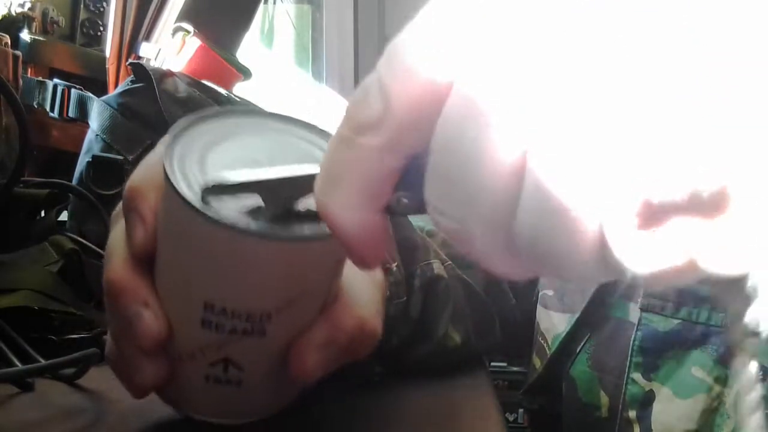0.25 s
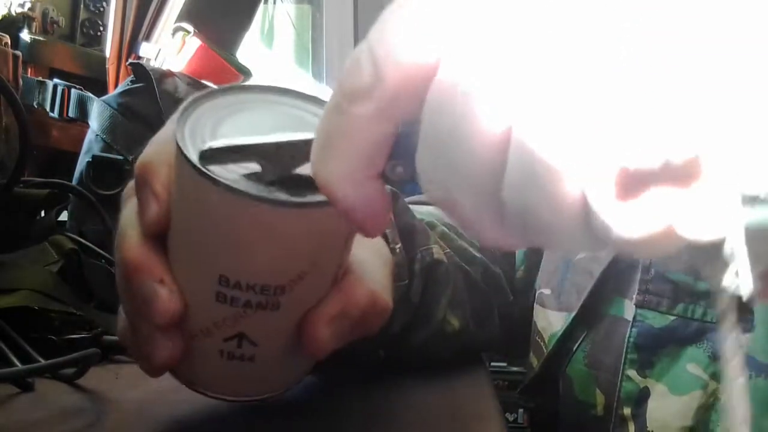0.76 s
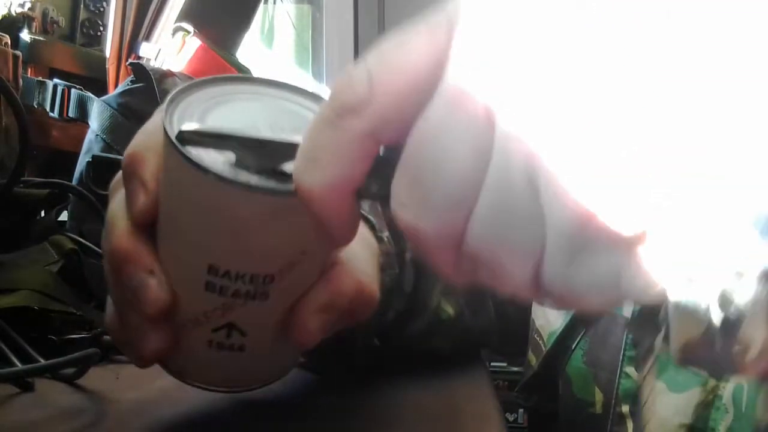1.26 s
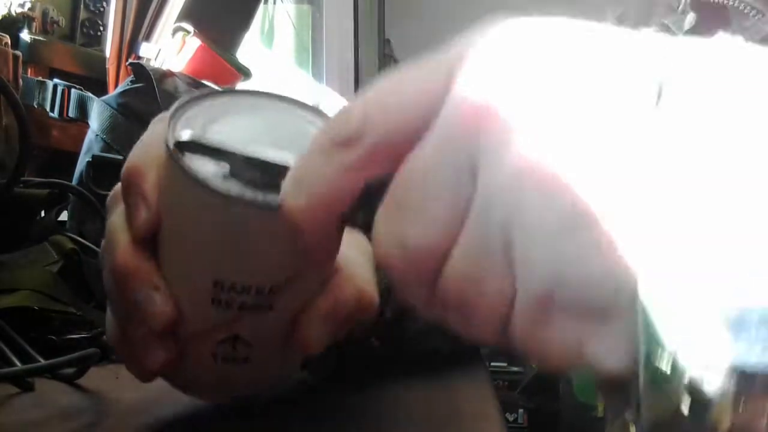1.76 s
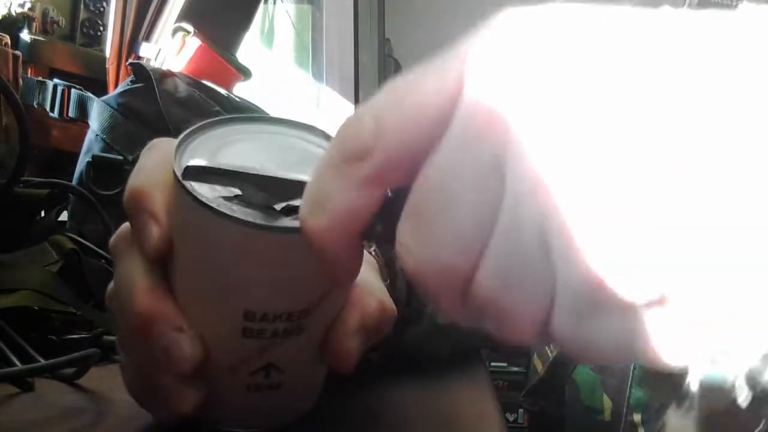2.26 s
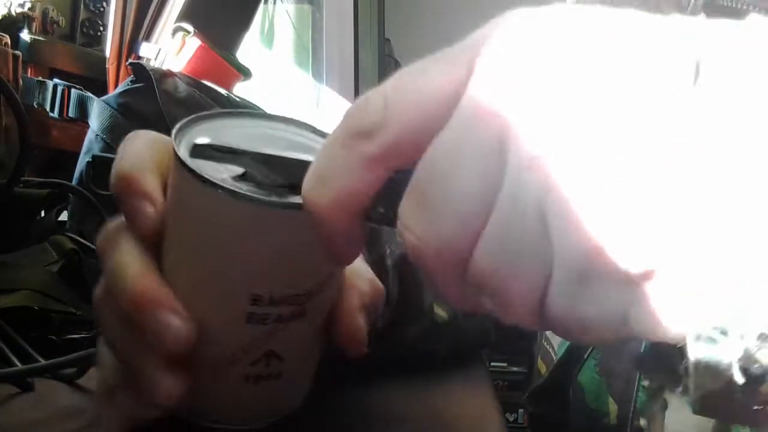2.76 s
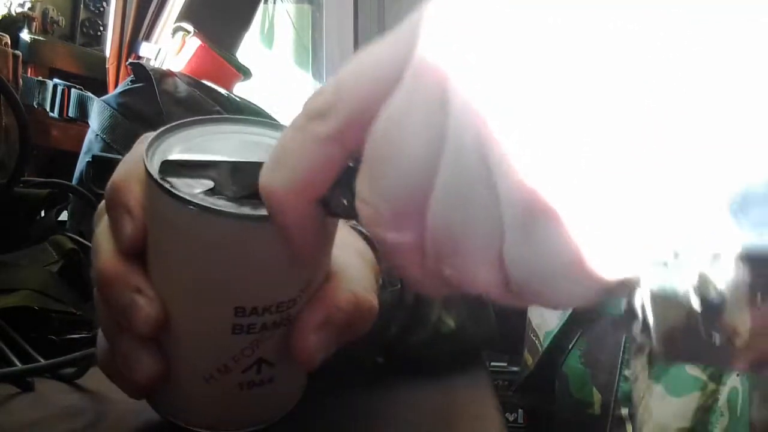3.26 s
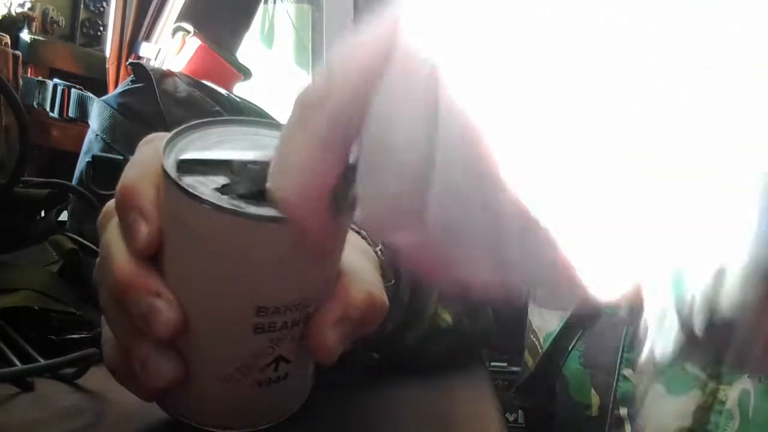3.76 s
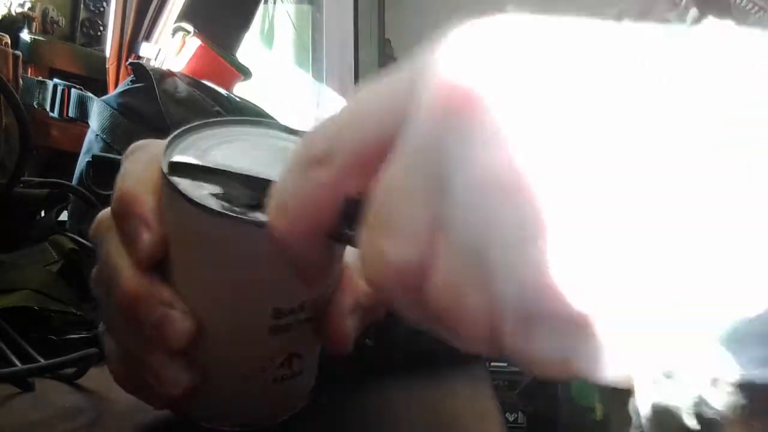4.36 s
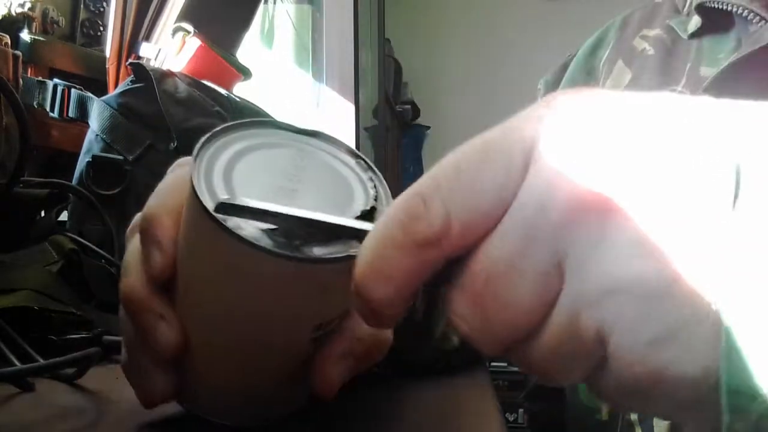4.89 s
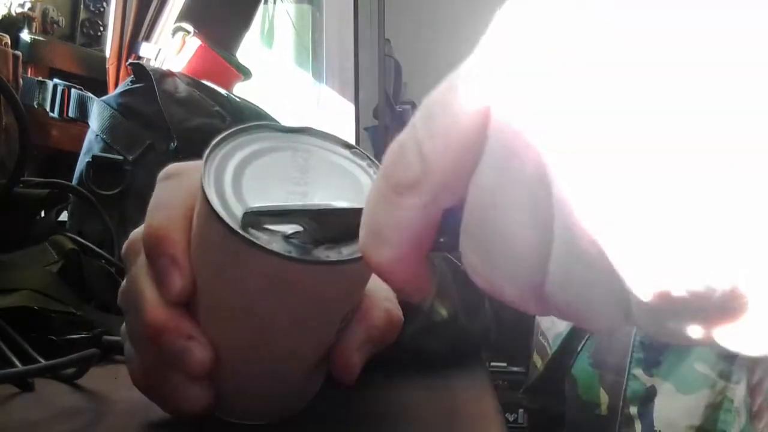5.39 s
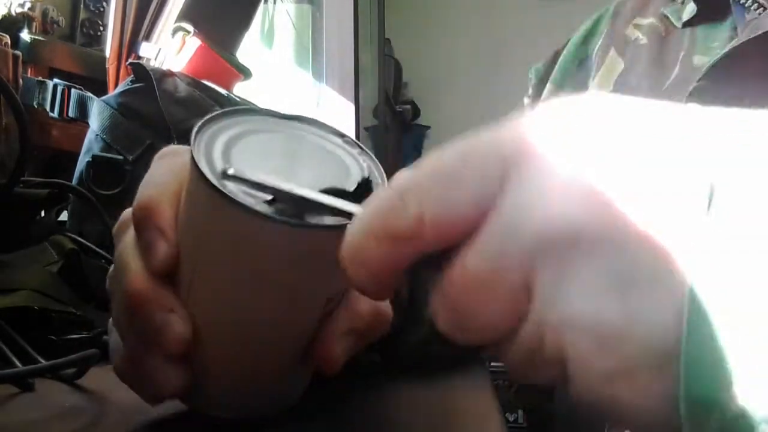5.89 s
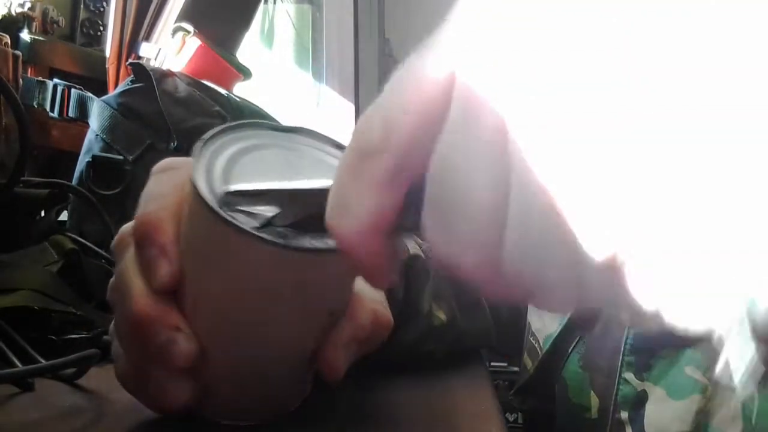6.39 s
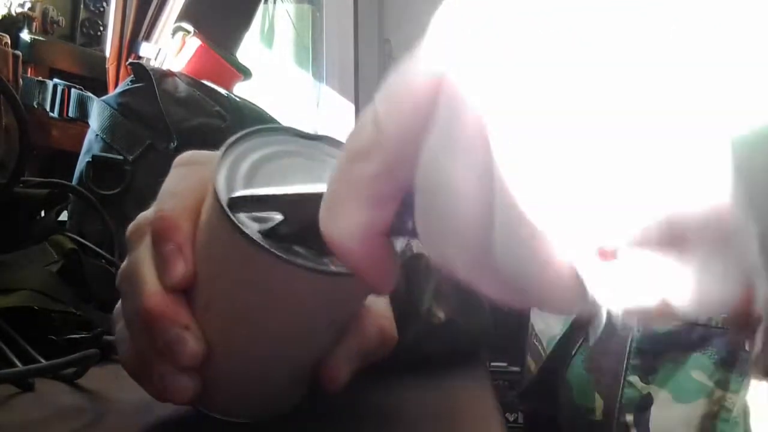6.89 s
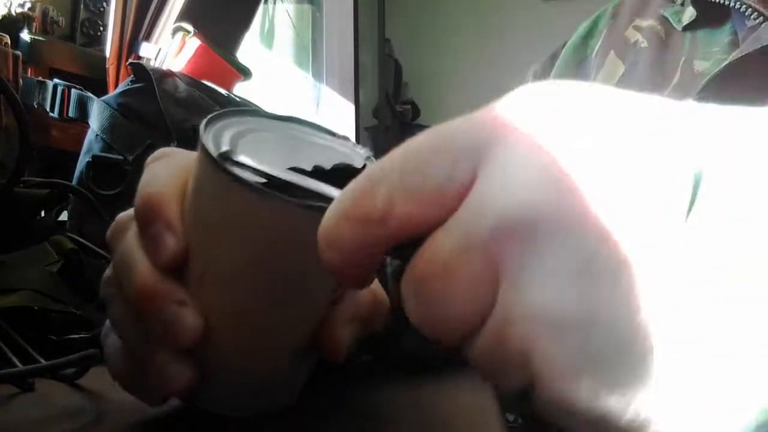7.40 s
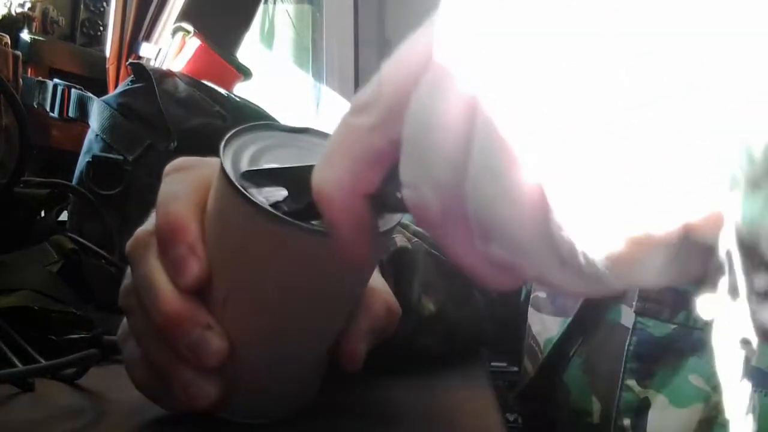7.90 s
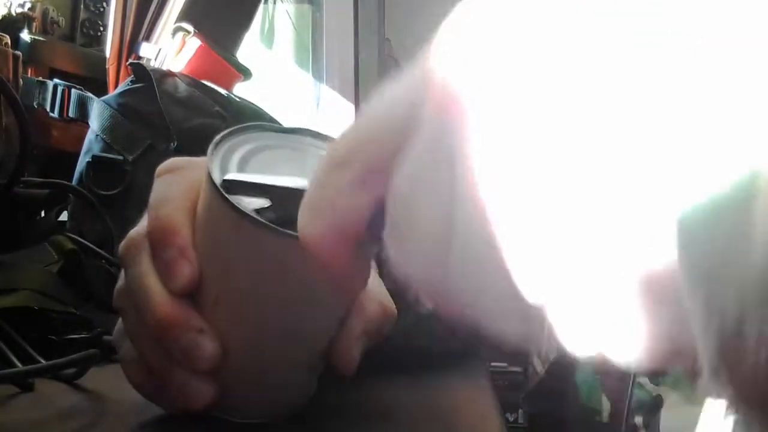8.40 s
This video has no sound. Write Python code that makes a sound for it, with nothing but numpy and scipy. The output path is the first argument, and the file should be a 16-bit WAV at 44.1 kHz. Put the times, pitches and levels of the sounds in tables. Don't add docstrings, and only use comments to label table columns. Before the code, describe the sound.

A small lever opener bites round an empty steel tin's rim, with irregular hollow clunks, dull metallic tears and gritty scrapes, then brighter loose snaps.

```python
import sys
import numpy as np
from scipy import signal
from scipy.fft import rfft, irfft, next_fast_len
from scipy.io import wavfile

SR = 44100
rng = np.random.default_rng(int(sys.argv[2]) if len(sys.argv) > 2 else 0)


def to_linear_factor(level_db):
    exponent = np.asarray(level_db, float) / 20
    return 10 ** exponent


def persist_wave(psi):
    counts = np.round(np.clip(psi, -1, 1) * 32767).astype(np.int16)
    wavfile.write(sys.argv[1], SR, np.atleast_2d(counts).T)


N = 381465

# (pitch_hz, level_db, fade_60db_s)
LID_MODES = [(487.6, -17, .09), (697, -9, .1), (812.7, -18.5, .12)]
# (pitch_hz, level_db, fade_60db_s)
WALL_MODES = [(1038, 1.5, 0.059), (1140, 2.5, 0.048), (1324, -7, 0.062), (1632, -1.5, 0.024),
              (1722, -12.5, 0.059), (1910, -13, 0.078), (2142, -16.5, 0.057)]
# (pitch_hz, level_db, fade_60db_s)
BLADE_MODES = [(2970, 5, 0.065), (3430, -6, 0.032), (3465, -11, 0.11), (3690, -11, 0.054), (4146, 0, 0.029),
               (5130, -9, 0.1), (5580, -13, 0.081), (5990, -1, 0.056), (6430, 0.5, 0.022), (6900, -9, 0.03),
               (7370, -9, 0.07)]
# (pitch_hz, level_db)
SHEET_COLOUR = [(2000, -13), (2800, 1.5), (3600, -3.5), (4600, -6), (5300, -4), (6800, 1), (8000, -11),
                (9500, -26), (12000, -49), (16000, -54.5)]
# (peak_s, lid_db, lid_note_hz, wall_db, blade_db), wall and blade relative to lid
LOOSE_SNAPS = [(7.1301, -49, 680, -12, 6), (7.1463, -15, 654, -2, 1.5), (7.3773, -36.5, 626, 4.5, -4.5),
               (7.4564, -35, 655, 0.5, -8), (7.4925, -39.5, 674, 7.5, -4.5),
               (7.5036, -32.5, 647, -0.5, 4.5), (7.6824, -44.5, 638, 6.5, 2.5),
               (8.0486, -31, 774, -7, -4.5), (8.0564, -38.5, 704, 8, -1), (8.0906, -26.0, 646, 8.5, 10.5),
               (8.109, -39.5, 610, 3, 10), (8.2776, -32, 654, 7, -7.5), (8.337, -35, 751, 0.5, -7),
               (8.369, -34, 751.0, 7.5, 22), (8.4866, -49.5, 823, 4.5, 12), (8.5478, -38.5, 647, 5.5, 11.5),
               (8.6236, -41.5, 746, 5, -1)]


def unit(x):
    return x / np.sqrt(np.mean(np.abs(x) ** 2) + 1e-20)


def along(points, hz):
    f, v = np.transpose(points)
    return np.interp(np.log(hz + 1), np.log(f + 1), v)


def filtered(x, response):
    m = next_fast_len(x.shape[-1] + 8192)
    spectrum = rfft(x, m) * response(np.fft.rfftfreq(m, 1 / SR))
    return irfft(spectrum, m)[..., :x.shape[-1]]


def band(lo_hz, hi_hz):
    return lambda f: 1 / np.sqrt((1 + (lo_hz / (f + 1)) ** 8) * (1 + (f / hi_hz) ** 8))


def wobble(rate):
    knots = int(N * rate / SR) + 2
    return np.interp(np.arange(N) * rate / SR, np.arange(knots), rng.standard_normal(knots))


def rings(modes, t, scatter_db):
    hz, db, t60 = np.transpose(modes)[..., None]
    luck = rng.standard_normal((2, len(modes), 1))
    fade = np.exp(np.float32(-np.log(1000) / t60 * t))
    phase = np.float32(2 * np.pi * hz * (1 + .008 * luck[0]) * t + 2 * luck[1])
    return np.sum(to_linear_factor(db + scatter_db * luck[0]) * fade * np.sin(phase), 0)


def driven(modes, force, wander_db):
    out = np.zeros(N)
    for hz, db, t60 in modes:
        r = to_linear_factor(-60 / (t60 * SR))
        gain = to_linear_factor(db + wander_db * wobble(25)) * np.sqrt(2 * (1 - r * r))
        resonator = [1, -2 * r * np.cos(2 * np.pi * hz / SR), r * r]
        out += signal.lfilter([.5, 0, -.5], resonator, gain * force)
    return out / np.linalg.norm(to_linear_factor([db for _, db, _ in modes]))


def room_tone():
    # (pitch_hz, level_db_per_hz)
    hiss_colour = [(15, -28), (25, 3.5), (85, -9), (714, -11), (840, -11.5), (1230, -16), (2480, -26.5),
                   (5280, -36), (6210, -36), (9800, -52.5), (16000, -44)]
    # (pitch_hz, level_db)
    whines = [(6040, -97), (12080, -93)]
    # (time_s, level_db)
    hiss_level = [(1.7, -3.5), (2.1, 1)]
    t = np.arange(N) / SR
    hiss = unit(filtered(rng.standard_normal(N), lambda hz: to_linear_factor(along(hiss_colour, hz))))
    whine = sum(to_linear_factor(db) * np.sin(2 * np.pi * hz * t) for hz, db in whines)
    return to_linear_factor(-59.5 + np.interp(t, *np.transpose(hiss_level))) * hiss + whine


def room(x):
    # (pitch_hz, fade_60db_s)
    room_fade = [(200, 0.18), (1500, 0.12), (8000, 0.047)]
    hz, t, z = signal.stft(rng.standard_normal(SR // 2), SR, nperseg=256)
    fade = to_linear_factor(-60 * t / along(room_fade, hz)[:, None])
    tail = signal.istft(z * fade, SR, nperseg=256)[1]
    late = np.pad(x, (200, 0))
    return signal.fftconvolve(late, tail / np.linalg.norm(tail))[:N]


def table():
    # (start_s, peak_db)
    thumps = [(0.266, -46), (2.094, -36), (2.294, -49.5), (2.479, -37.5), (2.718, -40.5), (2.913, -34.5),
              (3.264, -49.5), (3.492, -50.5), (4.452, -43), (4.8, -60), (6.024, -32), (6.783, -43.5),
              (7.247, -45.5), (7.73, -36), (8.155, -42), (8.276, -45), (8.455, -53.5)]
    # (start_s, peak_db)
    jolts = [(1.895, -46.5), (3.111, -49.5), (3.605, -45), (3.819, -37.5), (4.003, -35.5), (4.345, -37),
             (5.115, -38), (5.703, -47), (6.123, -35.5), (6.72, -41.5), (7.504, -50), (8.545, -47.5)]
    # (pitch_hz, level_db, fade_60db_s)
    push_modes = [(134, 3.0, 0.093), (166, 4.5, 0.061), (69, -27.5, .1), (202, -4.5, 0.091)]
    knock_modes = [(214, 1, 0.071), (142, -5.5, 0.11), (291, -4, 0.089)]
    out, t = np.zeros(N + SR // 4), np.arange(SR // 4) / SR
    board = sum(-to_linear_factor(db - 60 * t / t60) * np.sin(2 * np.pi * hz * t) for hz, db, t60 in push_modes)
    soft_start, quick_start = 1 - np.exp(-t / 0.0043), 1 - np.exp(-t / 0.0017)
    for s, db in thumps:
        out[round(s * SR):][:len(t)] += to_linear_factor(db + 5.0) * board * soft_start
    for s, db in jolts:
        knock = rings(knock_modes, t, scatter_db=1.0)
        out[round(s * SR):][:len(t)] += to_linear_factor(db + 4.0) * knock * quick_start
    return out[:N]


def contacts():
    # (peak_s, lid_db, lid_note_hz, wall_db, blade_db), wall and blade relative to lid
    snaps = [(0.0201, -29, 598, -7.5, -26), (0.346, -27, 583, -6, -26), (0.5704, -13, 682, -18, -25.5),
             (1.6744, -34.5, 510, -16.0, -39), (1.7787, -16.5, 760, -8.5, -14),
             (1.897, -25.5, 683, 1.5, -16), (1.9064, -14.5, 674, -6, -23), (2.406, -6.5, 757, -16.5, -25.0),
             (2.4936, -19, 696, -11, -14), (2.7599, -33.0, 711, -24, -17), (2.8332, -27.5, 742, -7.5, -28),
             (3.2546, -24.5, 722, -19, -31), (3.8214, -22, 717, -7.5, -17),
             (3.9892, -28.5, 538, -1.5, -7.5), (4.0099, -5.5, 613, -6.0, -24.5),
             (5.1196, -27, 735.0, 0.5, -13), (5.281, -30.0, 786, -12, -20),
             (5.8829, -36.5, 737.0, 4.5, -12.5), (5.9667, -28.5, 486, 10.5, -10),
             (6.0066, -23.5, 756, -0.5, -6.0), (6.129, -19, 786, 0.1, -4.5), (6.2213, -39, 725, -2.5, -26),
             (6.548, -17.5, 770, -5.5, -13.5), (6.5886, -18.0, 964, -6.5, -25.5)]
    # (peak_s, lid_db, lid_note_hz, wall_db, blade_db), wall and blade relative to lid
    cuts = [(0.1977, -20, 630, -10, -22.5), (0.3625, -22.5, 606, 0, -31), (0.5828, -6, 775, -6.5, -24.5),
            (0.7271, -17.5, 586, -12, -27), (0.909, -16.5, 623, -27, -24.5),
            (0.9299, -23.5, 573, -0.5, -16), (1.0297, -31, 634, -13, -22), (1.6874, -24.5, 584, -9, -27),
            (1.6956, -24.5, 620, -8, -28), (2.0366, -15, 714, -7, -21.5), (2.226, -10, 645, -6.5, -24),
            (2.2764, -21.5, 773, -12, -19.5), (2.2908, -30, 790, -31, -9), (3.0742, -31.5, 698, -9, -28),
            (3.3988, -23.5, 751, -14, -30), (3.6103, -28, 643, -4.5, -12), (4.057, -33, 580, -13.0, -28),
            (4.3528, -18.5, 747, 0.3, -12), (5.6561, -41.5, 760, 10, -20.5), (5.7092, -23.5, 812, 0, -14),
            (5.7411, -29, 760, -3, -21), (5.907, -20, 743, -11, -30), (6.5276, -39.5, 754, 4, 1.5),
            (6.7308, -9.5, 735, -2.0, -12)]
    # (peak_s, lid_db, lid_note_hz, rise_ms)
    tears = [(0.3736, -23, 535, 20.4), (0.4303, -10, 634, 9.9), (0.6058, -30.5, 767, 18),
             (0.655, -29.5, 620.0, 8.9), (0.896, -19.5, 610.0, 15), (1.172, -36, 636, 11.7),
             (1.2783, -28, 541, 13.0), (1.4493, -41, 690.0, 21), (1.5346, -41, 722, 19),
             (1.7099, -13, 636, 10.5), (1.7201, -15, 737, 12.3), (2.0613, -21, 612, 21),
             (2.9486, -30.5, 711, 13), (3.141, -26, 746, 14.2), (3.6325, -30.5, 758, 19),
             (3.7976, -26, 840, 15.0), (3.832, -19, 770, 13.7), (4.0922, -32, 739.0, 9.7),
             (4.1538, -32.5, 753, 20), (4.3161, -31.5, 810, 15.4), (4.341, -24.5, 752, 13.5),
             (4.3892, -32.5, 780, 18), (5.6682, -38, 688.0, 9.3)]
    # (peak_s, lid_db, blade_db), blade relative to lid
    ticks = [(0.6298, -49.0, -6.5), (0.644, -51.5, 11), (2.808, -57.5, 8.5), (3.3336, -42, -11),
             (3.4964, -39, -7), (4.4581, -34, -1.5), (4.6107, -48.5, 8.5), (4.8089, -52.5, 11.5),
             (5.5692, -48, -19), (6.2822, -35.5, 2), (6.4506, -51.5, 5.5)]
    snap_ms, cut_ms, tick_ms, flap_ms = 3, 6.5, 3.2, 2.4
    brighten = 1.6
    bites_list = [(*b, snap_ms) for b in snaps]
    bites_list += [(*b, cut_ms) for b in cuts]
    bites_list += [(*b, flap_ms) for b in LOOSE_SNAPS]
    bites_list += [(s, db, hz, -13.5 + brighten * s, -32 + brighten * s, ms) for s, db, hz, ms in tears]
    bites_list += [(s, db, 690, -3.5, blade_db, tick_ms) for s, db, blade_db in ticks]
    return sorted(bites_list)


def strokes(t):
    # (peak_s, lid_db, blade_db, fall_20db_s)
    slides = [(0, -54.5, -75, 1.1), (.2, -46.5, -63, 0.05), (0.372, -46.5, -49.5, 0.05),
              (.6, -40.5, -59.5, 0.14), (1.71, -44.5, -65, .14), (1.94, -43, -61, 0.32),
              (2.215, -26.5, -53, 0.14), (3.02, -49, -64, 0.74), (3.631, -34, -56, 0.0157),
              (4.021, -35.5, -59, .14), (4.53, -59.5, -60.5, 0.54), (5.9, -42.5, -65, 0.08),
              (6.02, -53, -62.5, 0.53), (6.74, -45, -62, 0.2), (7.16, -43, -49, 0.1064),
              (7.7, -58, -66, .25), (8.109, -56, -59.5, 0.1), (8.38, -54, -59.5, 0.4)]
    # (start_s, lid_db, blade_db, held_s)
    rubs = [(0.877, -47.5, -68, 0.053), (1.05, -46.5, -79.5, 0.11), (1.258, -45, -72, 0.029),
            (1.365, -51.5, -83, 0.012), (1.425, -49, -89, 0.15), (2.411, -43.5, -57, 0.15),
            (2.769, -52, -59, 0.18), (3.787, -38.5, -57.5, 0.055), (4.325, -35.5, -58.5, 0.087),
            (5.009, -54.5, -81, 0.31), (5.639, -41, -61, 0.13), (6.51, -50, -68, 0.074),
            (6.89, -54, -62, 0.086), (7.45, -46.5, -56.5, 0.054)]
    catch_s, let_go_s = 0.036, 0.033
    rasp_follows = 0.74
    rows = [(*r[:3], 0, r[3]) for r in slides] + [(*r, let_go_s) for r in rubs]
    lid, blade = 1e-5, 1e-5
    for s, lid_db, blade_db, held, fall in rows:
        away = np.maximum((s - t) / catch_s, (t - s - held) / fall)
        drop = -20 * np.maximum(away, 0) ** 1.58
        lid = lid + to_linear_factor(lid_db + drop)
        blade = blade + to_linear_factor(blade_db + rasp_follows * drop)
    return 20 * np.log10([lid, blade])


def crunch():
    gains, t = np.zeros((3, N + SR // 5)), np.arange(-SR // 10, SR // 10) / SR
    for s, db, _, wall_db, blade_db, rise_ms in contacts():
        swell = np.exp(-(t / (0.001 * rise_ms + 0.0011)) ** 2)
        tear = to_linear_factor(db - 22.0 + 0.75 * rise_ms) * swell
        shares = to_linear_factor(np.array([[0], [wall_db - 3.0], [blade_db]]))
        gains[:, round(s * SR):][:, :len(t)] += shares * tear
    return gains[:, SR // 10:][:, :N]


def grit(per_s, spread_db):
    chance = per_s / SR * to_linear_factor(2.5 * wobble(40))
    happens = rng.random(N) < chance
    size = to_linear_factor(spread_db * rng.standard_normal(N))
    slips = happens * size * rng.choice([-1, 1], N)
    return unit(slips) + .18 * rng.standard_normal(N)


def scrape():
    t = np.arange(N) / SR
    s = t[::64]
    lid_db, blade_db = strokes(s)
    wall_db = 0.63 * lid_db + 0.38 * blade_db - 0.7
    pressure = to_linear_factor(np.array([np.interp(t, s, c) for c in (lid_db, wall_db, blade_db)]))
    drag = pressure + crunch()
    slips = grit(per_s=210, spread_db=4.5)
    fine_slips = unit(1.04 * slips + grit(per_s=1400, spread_db=-0.5))
    push, rub, rasp = drag * [slips, slips, fine_slips]
    lid_hz = np.interp(t, *np.transpose(contacts())[[0, 2]]).clip(560, 800)
    turn = np.exp(2j * np.pi * np.cumsum(lid_hz) / SR)
    pole = to_linear_factor(-60 / (0.034 * SR))
    swing = signal.lfilter([1], [1, -pole], push / turn) * turn
    bent = np.sqrt(2 * (1 - pole ** 2)) * swing.imag
    lid = filtered(bent + .5 * driven(LID_MODES, push, wander_db=3.5), band(434, 835))
    wall = filtered(driven(WALL_MODES, rub, wander_db=4.5), band(950, 2050))
    sheet = to_linear_factor(5.0 + 5.2 * wobble(30)) * filtered(rasp, lambda hz: to_linear_factor(along(SHEET_COLOUR, hz)))
    blade = filtered(driven(BLADE_MODES, rasp, wander_db=2.0), band(1800, 8500))
    return lid + wall + sheet + 0.3 * blade


def bites():
    # (start_s, pitch_hz, level_db, fade_60db_s)
    free_notes = [(0.582, 2970, -21, 0.042), (1.78, 1366, -32.5, 0.18), (1.78, 1933, -31, 0.11),
                  (1.904, 1162, -28.5, 0.11), (2.199, 1140, -21.5, 0.11), (2.405, 440, -15.5, 0.093),
                  (2.405, 819, -15.5, 0.17), (2.941, 1072, -35.5, 0.23), (3.135, 1106, -39, 0.24),
                  (4.009, 716, -13.5, 0.097), (4.009, 1918, -17, 0.044), (6.726, 392, -13.5, 0.035),
                  (6.73, 1790, -21, 0.063), (7.146, 634, -16.5, 0.12), (7.15, 2400, -26.5, .1),
                  (8.091, 603, -29.5, 0.17), (8.091, 3400, -20, 0.071), (8.091, 3040, -15, 0.032),
                  (8.091, 3820, -32.5, 0.15), (8.278, 618, -21.5, 0.099), (8.369, 5130, -23, 0.067)]
    # (pitch_hz, level_db, fade_60db_s)
    flap_modes = [(1202, 2, 0.04), (1558, 3, 0.051), (1873, -12, 0.16), (2103, -7, 0.058),
                  (2400, -20, 0.12)]
    size, lead = SR // 5, SR // 50
    out, t = np.zeros(N + size + lead), np.arange(size) / SR
    noise = rng.standard_normal((len(contacts()), size))
    spray = unit(filtered(noise, lambda hz: to_linear_factor(along(SHEET_COLOUR, hz))))
    sparks = unit(filtered(noise, band(10000, 14000)))
    for (s, db, lid_hz, wall_db, blade_db, rise_ms), fizz, spark in zip(contacts(), spray, sparks):
        rise = np.clip(rise_ms / 1000, .001, .012)
        after = np.maximum(t - rise, 0)
        swell = np.sin(np.pi / 2 * np.minimum(t / rise, 1)) ** 2
        loose = s >= LOOSE_SNAPS[0][0]
        grip = swell * (to_linear_factor(-60 * after / 0.021) + to_linear_factor(-4 if loose else -12))
        lid = rings([(lid_hz, 0, .11)] + LID_MODES, t, scatter_db=-1.0)
        wall = rings(flap_modes if loose else WALL_MODES, t, scatter_db=2.5)
        crack_fade = to_linear_factor(-60 * after / 0.015) + to_linear_factor(-18 - 60 * after / 0.21)
        crack = (fizz + to_linear_factor(-35.5 + 0.6 * blade_db) * spark) * crack_fade
        snap = np.clip((t / rise - .35) / 0.26, 0, 1)
        blade_ring = to_linear_factor(-5.5 if loose else -9.5) * rings(BLADE_MODES, t, scatter_db=5.0)
        blade = snap * (blade_ring + crack)
        bite = to_linear_factor(1.5) * grip * lid + to_linear_factor(wall_db - 3.5) * grip * wall + to_linear_factor(blade_db - 8) * blade
        out[lead + round((s - rise) * SR):][:size] += to_linear_factor(db) * bite
    soft_start = 1 - np.exp(-t / 0.0031)
    for s, hz, db, t60 in free_notes:
        note = to_linear_factor(db - 60 * t / t60) * np.sin(2 * np.pi * hz * t)
        out[lead + round(s * SR):][:size] += note * soft_start
    return out[lead:lead + N]


def scene():
    tin = bites() + scrape() + table()
    return (tin + to_linear_factor(-15.0) * room(tin) + room_tone())[None]


def roll_off(x):
    return signal.sosfilt(signal.butter(12, 16620, fs=SR, output="sos"), x)


def record(dry):
    heard = filtered(dry, band(60, 15000))
    return roll_off(heard)


dry = scene()
out = record(dry)
persist_wave(out)
```